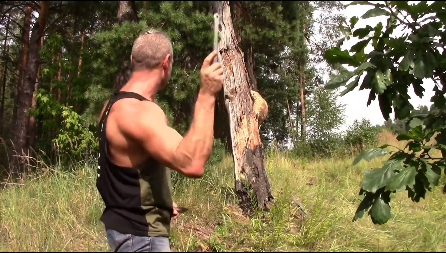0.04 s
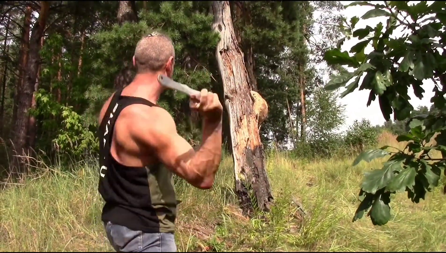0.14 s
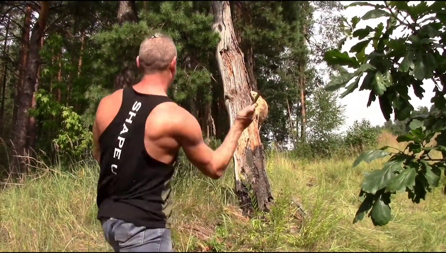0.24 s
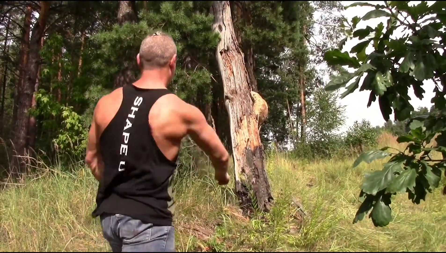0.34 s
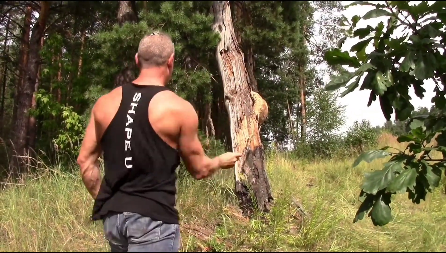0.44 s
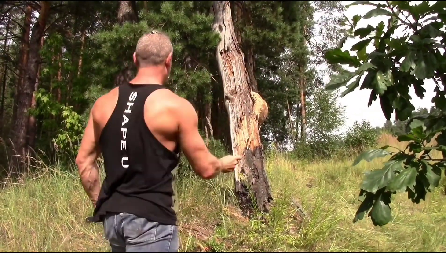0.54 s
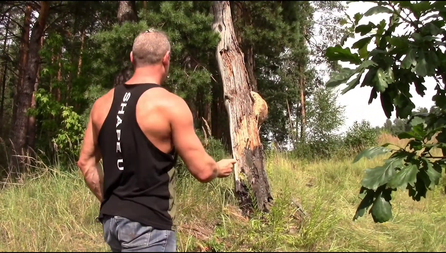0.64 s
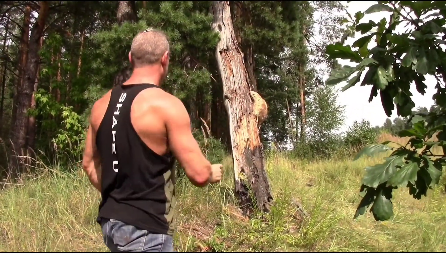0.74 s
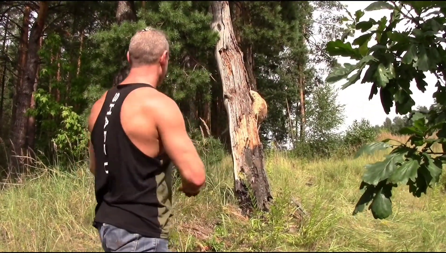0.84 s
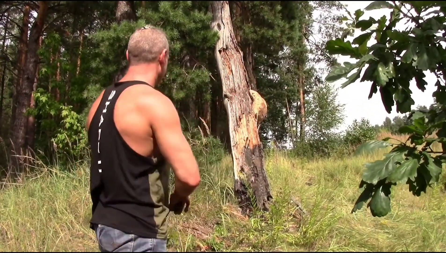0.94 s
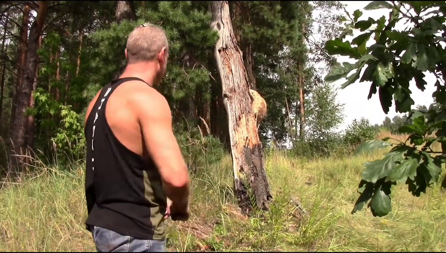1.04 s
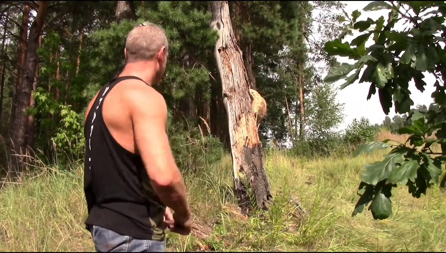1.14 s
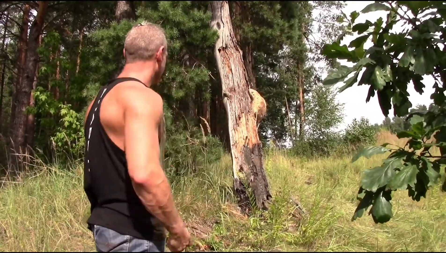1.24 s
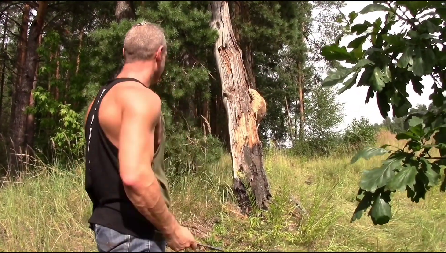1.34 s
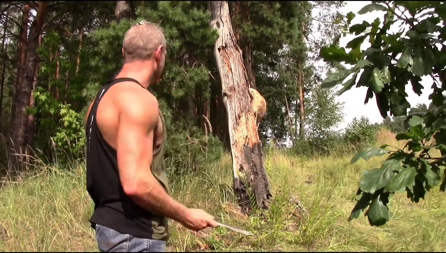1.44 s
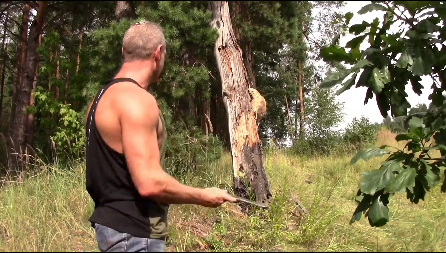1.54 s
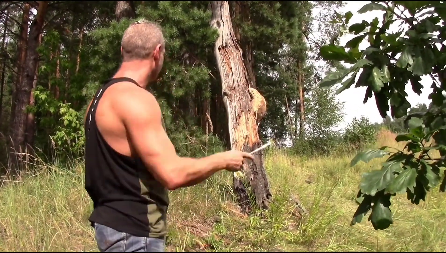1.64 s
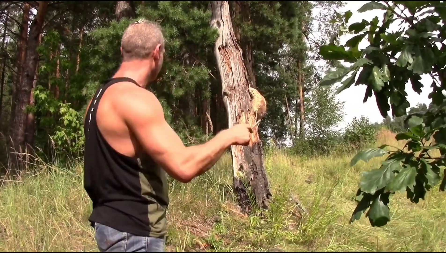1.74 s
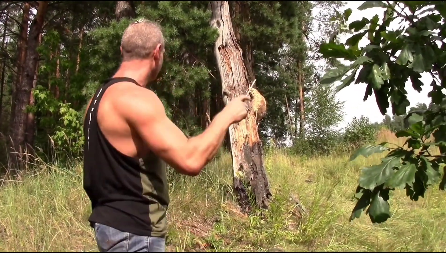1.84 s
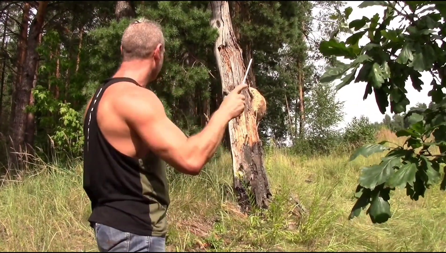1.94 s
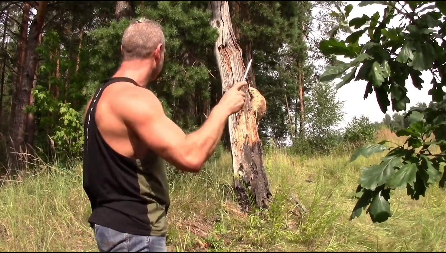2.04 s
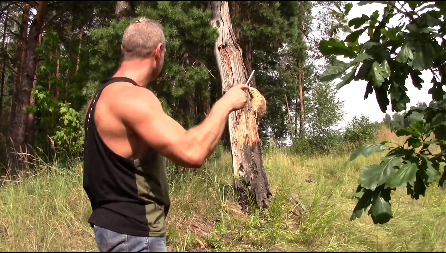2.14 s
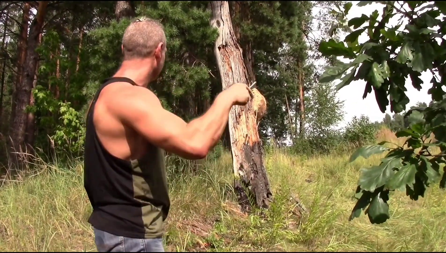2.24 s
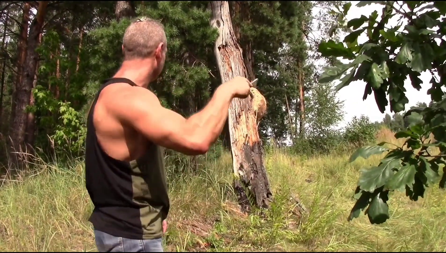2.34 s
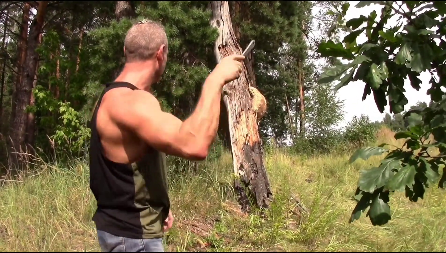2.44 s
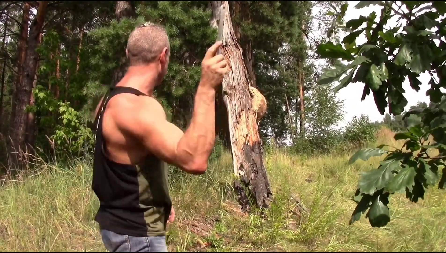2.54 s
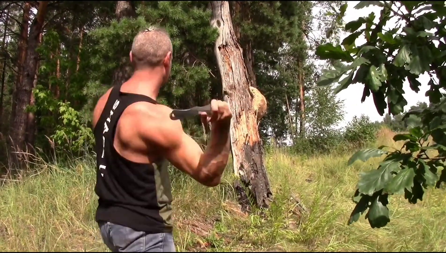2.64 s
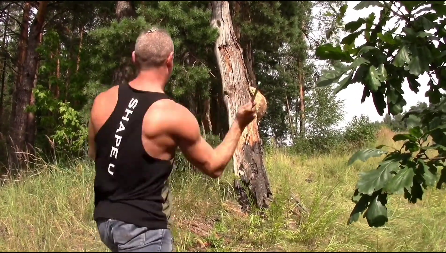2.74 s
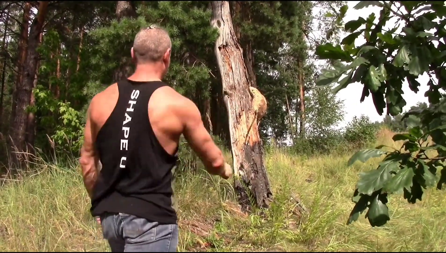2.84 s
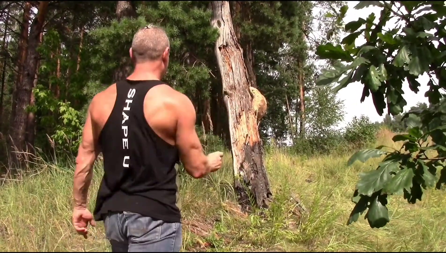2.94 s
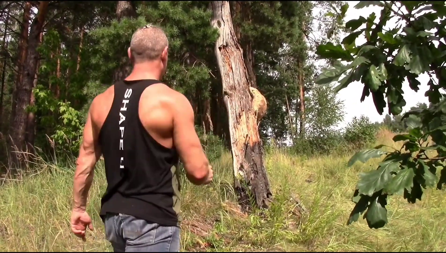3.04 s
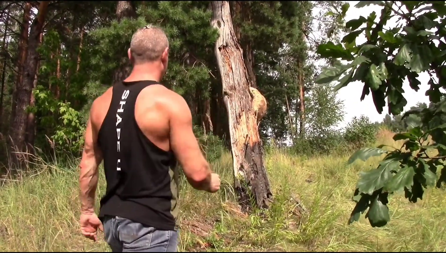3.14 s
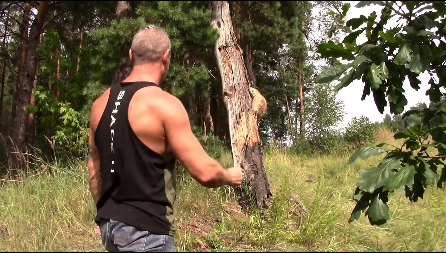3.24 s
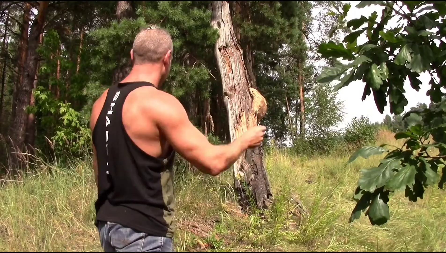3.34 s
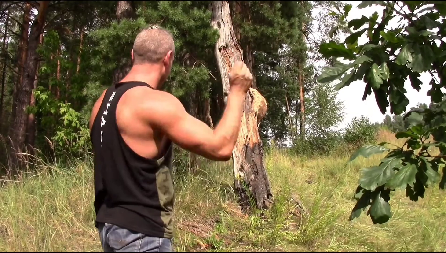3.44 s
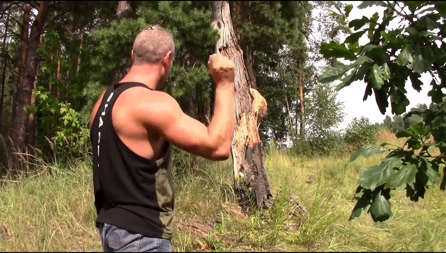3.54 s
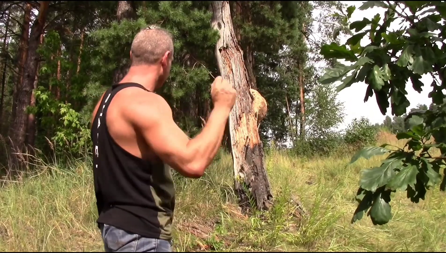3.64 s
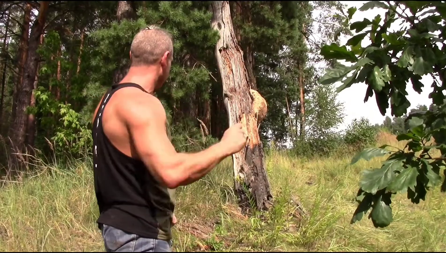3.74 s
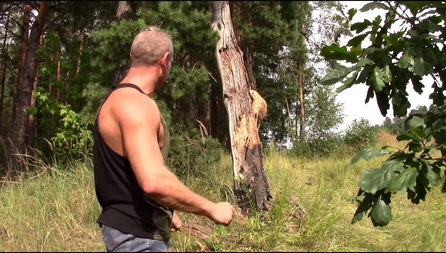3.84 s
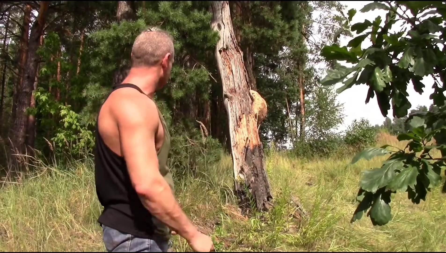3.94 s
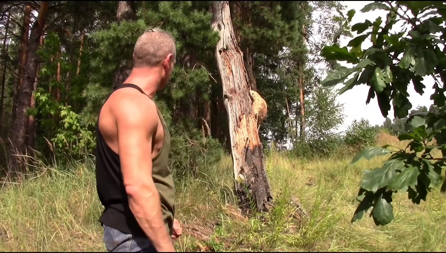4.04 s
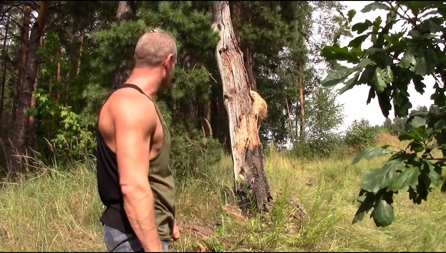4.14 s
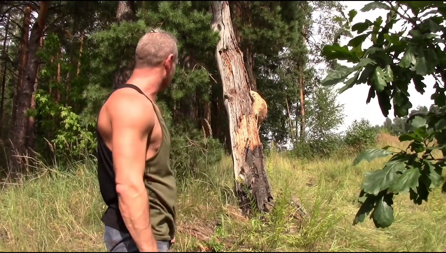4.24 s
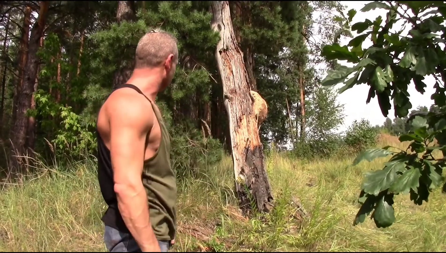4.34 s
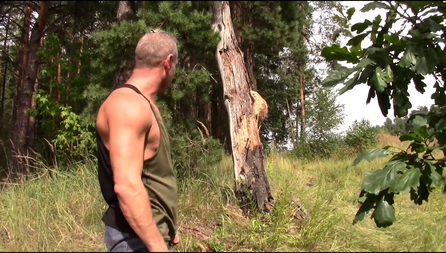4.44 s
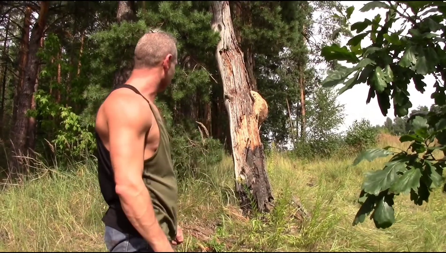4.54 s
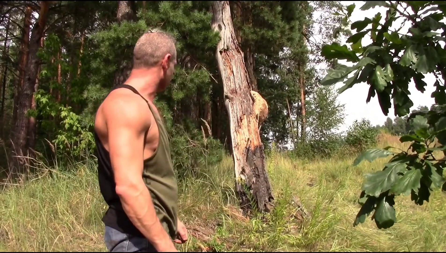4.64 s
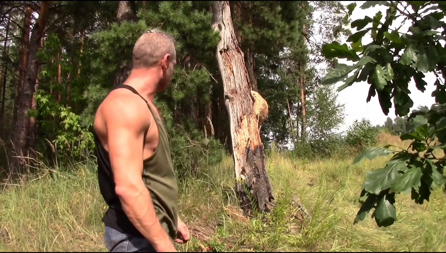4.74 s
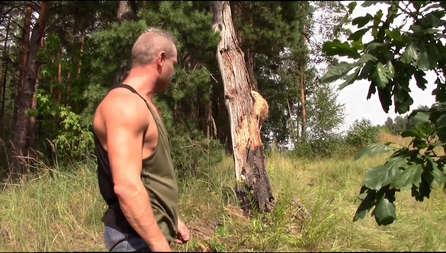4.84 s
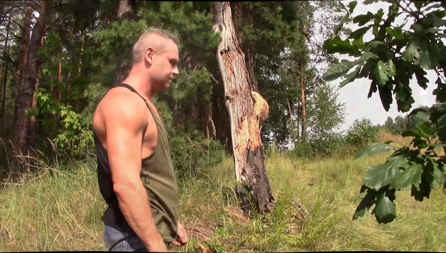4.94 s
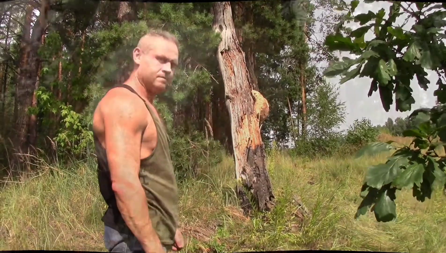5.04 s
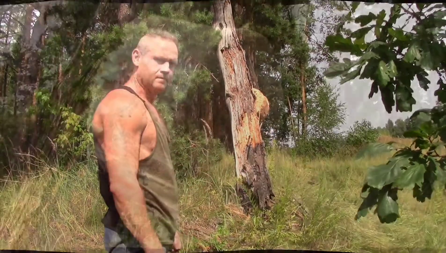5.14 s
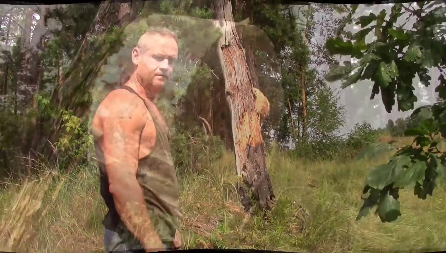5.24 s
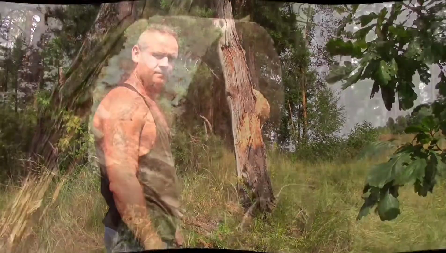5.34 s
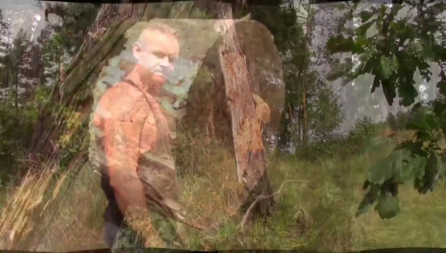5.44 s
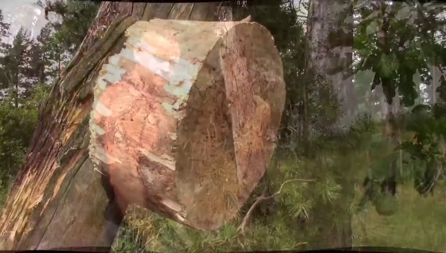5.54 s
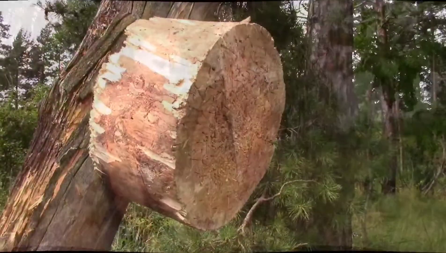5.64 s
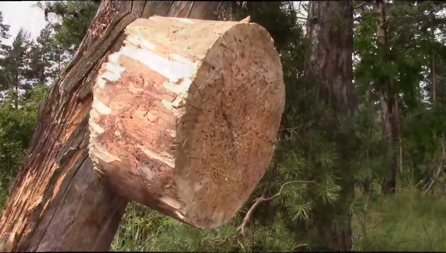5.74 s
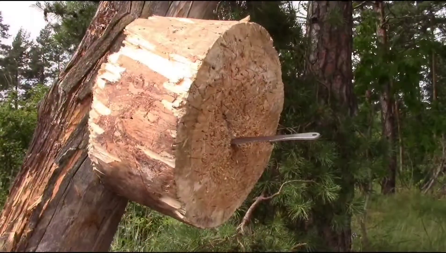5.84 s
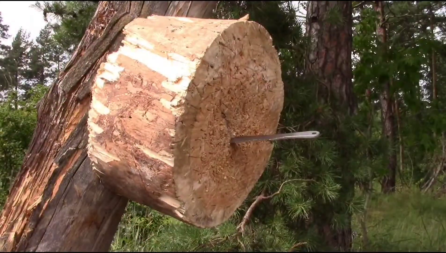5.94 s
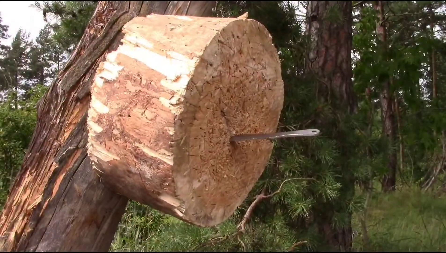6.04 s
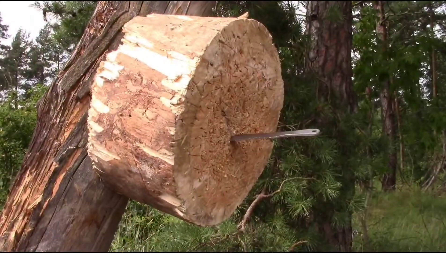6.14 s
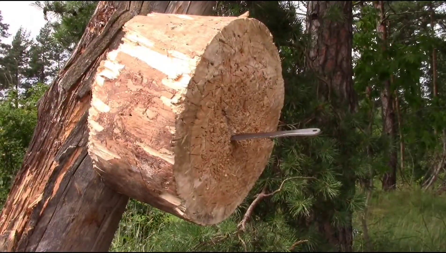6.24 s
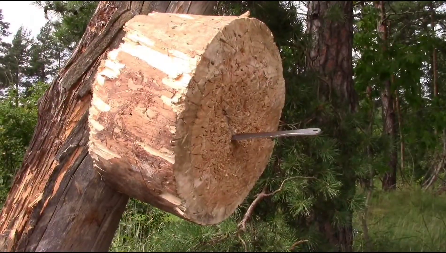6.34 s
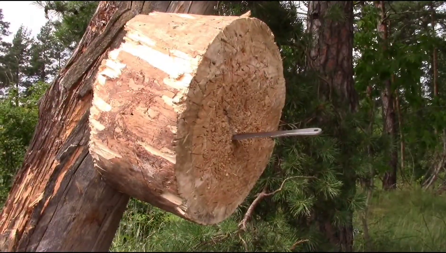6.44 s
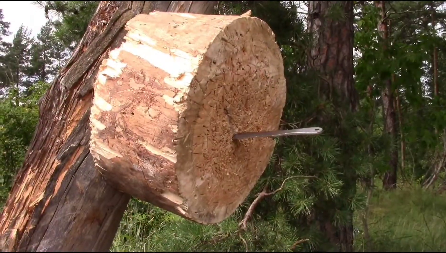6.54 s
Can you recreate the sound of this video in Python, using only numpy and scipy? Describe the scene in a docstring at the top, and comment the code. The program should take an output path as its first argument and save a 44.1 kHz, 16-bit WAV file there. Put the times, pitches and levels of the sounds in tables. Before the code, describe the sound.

Soft forest air and cloth rustle, three dry cracking knife hits in wood spaced seconds apart, ending with a short ringing clash of steel blades.

```python
"""Three knives thud into a log among pines at 0.7, 3.2 and 5.9 s: struck modes, fibre crack, bark rattle, echoes.
From the start cloth and grass rustle, twigs tick, the held blade pings and faint chirps pass; all are
shaped noise or decaying modes. The air, drifting noise with far insects, swells at 2.7 s while sinking ever
faster; at 4.94 s a closer air opens quickly, and a faint hum wavers from 5.05 to 6.6 s.
From 5.8 s the blades in the hand slide, squeak and clink: modes fed by noise slips, gliding noise, knocked modes."""
import sys
import numpy as np
from scipy import signal
from scipy.fft import rfft, irfft
from scipy.io import wavfile
from scipy.ndimage import uniform_filter1d

SR = 44100
rng = np.random.default_rng(int(sys.argv[2]) if len(sys.argv) > 2 else 0)


def waveform_to_disk(signal):
    """Save audio, clipped to [-1, 1], as 16-bit WAV at the path in sys.argv[1]."""
    frames = np.transpose(np.atleast_2d(signal))
    scaled = np.clip(frames, -1, 1) * 32767
    samples = np.round(scaled).astype(np.int16)
    wavfile.write(sys.argv[1], SR, samples)


N = 290619

# Colour of the low wash. Each row: frequency in Hz, relative density in dB.
WASH_COLOUR = [(15, -54.5), (30, -29.5), (134, -5.5), (182, -4.5), (271, -2), (413, 0), (1170, -10),
               (1580, -19), (3000, -27), (3900, -54), (6600, -120)]
# Colour of the leaf hiss before the cut. Each row: frequency in Hz, relative density in dB.
FAR_HISS_COLOUR = [(880, -33.5), (1500, 0.5), (2310, -0.5), (3150, -3), (6820, -5), (9000, -6.5),
                   (11200, -11.5), (15500, -13.5)]
# Colour of the closer leaf hiss after the cut. Each row: frequency in Hz, relative density in dB.
NEAR_HISS_COLOUR = [(880, 4), (1500, 10), (1580, 5.5), (3000, -1), (5040, -3), (9060, -5.5), (10600, -2),
                    (15500, -12)]
# Left-right likeness of the air. Each row: frequency in Hz, correlation 0-1.
AIR_LIKENESS = [(60, 0.98), (180, 0.94), (550, 0.96), (1650, 0.8), (4970, 0.57), (15000, 0.94)]
# Swells of the air. Each row: start in s, rise in s, hold in s, settling time constant in s,
# wash lift at the band centre in dB, hiss lift in dB.
AIR_SWELLS = [(2.704, 0.029, 0.28, 0.14, 9, 2.5), (5.436, 0.74, 0.017, 0.056, 1, 9.5)]
# Wavering hum. Each row: time in s, frequency in Hz, mean level in dB.
HUM_TRACK = [(5.05, 193.8, -64), (6.468, 167.1, -67), (6.59, 173, -71)]
# Tail among the trunks. Each row: frequency in Hz, t60 in s.
WOOD_T60 = [(120, 0.38), (400, 0.42), (800, 0.23), (1200, 0.2), (3000, 0.22), (6000, 0.15), (12000, 0.15)]
# Narrow gliding bands of noise: faint chirps, a steel ping at 4.238 s, blade squeaks. Each row: start in s,
# length in s, start Hz, end Hz, width in Hz, level before the fade window in dB.
GLIDE_EVENTS = [(0.55, 0.034, 2770, 2700, 130, -60), (1.466, 0.055, 2750, 2880, 150, -60.5),
                (2.978, 0.041, 2770, 2700, 170, -60), (3.035, 0.039, 2750, 2770, 180, -65),
                (4.238, .02, 5900, 5900, 500, -65), (6.081, 0.077, 1260, 3200, 410, -41.5),
                (6.11, 0.047, 3300, 4270, 530, -43.5), (6.024, 0.118, 4470, 4340, 244, -47.5),
                (6.165, 0.068, 3300, 4300, 200, -34), (6.085, 0.085, 2890, 2960, 230, -45.5)]
# Cloth and grass movements. Each row: middle in s, half length (to 1/e) in s, treble level at the middle in dB,
# body against the treble in dB.
RUSTLE_EVENTS = [(0.282, 0.17, -62.5, -4), (0.495, 0.045, -57.5, 6), (0.612, 0.042, -59.5, 10),
                 (0.924, 0.034, -59.5, 1), (1.038, 0.12, -64.5, -7), (1.248, 0.1, -54, -2),
                 (1.277, 0.034, -47, -7), (2.573, 0.046, -64, -12), (2.676, 0.038, -64, 2),
                 (2.805, 0.027, -65.5, -21), (2.987, 0.046, -63.5, 3), (3.091, .008, -63.5, 11.5),
                 (3.131, 0.0098, -64, 10), (3.386, 0.19, -69, 5.5), (5.397, 0.089, -62.5, 3),
                 (5.608, 0.06, -56, 2), (5.702, 0.021, -44.5, -0.5), (5.769, 0.065, -54.5, -2),
                 (5.851, 0.025, -51, 2), (6.346, 0.096, -63.5, 8)]
# Treble colour of a rustle. Each row: frequency in Hz, relative density in dB.
RUSTLE_COLOUR = [(1180, -50), (2000, -8), (2540, -11.5), (2970, -16), (3800, -13.5), (5130, -3.5),
                 (11300, -11), (15500, -19.5)]
# Ticks of twigs and seams, and one late steel rattle at 6.283 s. Each row: time in s, peak in dB, centre in Hz.
TICK_EVENTS = [(0.925, -35, 8000), (1.158, -31, 4100), (1.218, -51, 2500), (1.255, -27, 6000),
               (2.427, -43, 6000), (2.685, -45, 1700), (3.402, -41.5, 5000), (3.467, -28, 5104),
               (3.534, -44, 6600), (4.993, -43, 3405), (5.109, -45, 2980), (5.638, -38, 2500),
               (5.675, -35, 4500), (5.69, -26.5, 5870), (5.697, -20.5, 5700), (5.702, -23.5, 2360),
               (5.712, -26, 3460), (5.723, -21, 6540), (5.748, -33.5, 1970), (5.873, -33, 4600),
               (6.283, -25, 7500), (6.365, -33, 6950), (6.379, -33, 2100)]
# Dull taps in the hand. Each row: start in s, level in dB, frequency in Hz.
TAP_EVENTS = [(1.217, -37.5, 755), (1.241, -38, 785), (1.263, -32, 764), (1.288, -34.5, 795),
              (1.303, -37, 788), (2.686, -36.5, 967), (4.18, -56, 1600)]
# Touches of the held blade. Each row: start in s, level in dB, pitch factor, lift of the upper modes in dB.
PING_EVENTS = [(0.501, -35.5, 1, -10.5), (1.157, -47.5, 1.065, -22), (2.990, -58.5, 1.003, 2.5)]
# Blade damped by the fingers. Each row: frequency in Hz, relative level in dB, t60 in s.
HELD_BLADE_MODES = [(6200, 3, 0.068), (8420, 9, 0.052), (11000, -1, .03)]
# Long blade, free. Each row: frequency in Hz, relative level in dB, t60 in s.
LONG_BLADE_MODES = [(2000, -27.5, 0.23), (2910, -21, 0.08), (3370, -7, 0.043), (3740, -8, 0.13),
                    (6010, 10, 0.16), (6130, -22.5, 0.73), (7250, -7, 0.076), (7550, 6, 0.033),
                    (8030, 2.5, 0.094), (8640, -4.5, 0.23), (9600, -12, .035), (11710, -5, 0.073),
                    (12400, -20, 0.0265), (14700, -19, 0.064)]
# Short blade, free. Each row: frequency in Hz, relative level in dB, t60 in s.
SHORT_BLADE_MODES = [(4190, 1, 0.03), (6370, 4.5, 0.04), (7910, 4, 0.061), (8650, 9.5, 0.028),
                     (8810, 6, 0.073), (9100, -8, 0.058), (11700, -12, 0.053)]
# Blades sliding on each other. Each row: start in s, attack in s, hold in s, release in s, held level before pan
# in dB, share of the long blade 0-1 at the start, the same at the end.
SLIDE_EVENTS = [(5.821, 0.01, 0.13, 0.013, -56, 0.56, 0.45), (6, 0.06, 0.0037, 0.11, -37.5, 0.39, 0.23),
                (6.122, 0.037, 0.075, 0.013, -25.5, 0.05, 0.8)]
# Blades knocking together. Each row: start in s, peak before pan in dB, share of the long blade 0-1,
# factor on t60, brightness in dB per octave.
CLINK_EVENTS = [(6.022, -28, 0.1, 0.39, -4), (6.032, -28, 0.1, 0.55, -6), (6.039, -20, 0.2, 0.093, 0),
                (6.045, -19, 0, 0.12, 2), (6.052, -30, 0, 0.24, -3), (6.135, -24, 0.4, 0.38, 2),
                (6.1651, -18, 0.9, .3, -4), (6.176, -22, 1, 0.15, 0), (6.2034, -8, 0.73, 0.42, -2.5),
                (6.212, -12.5, 0.9, 0.38, 22), (6.227, -20, 0.6, 0.2, 5), (6.27, -10, 0.93, 0.59, -3.5)]
# Returns from nearby trunks. Each row: time of the blow in s, delay in s, gain on the blow in dB,
# centre of the returned band in Hz.
TRUNK_RETURNS = [(.698, 0.057, -15.5, 340), (.698, 0.1, -28, 950), (.698, .109, -29.5, 450),
                 (3.177, 0.08, -23, 920), (3.177, 0.11, -27, 340), (5.919, 0.031, -12.5, 1370),
                 (5.919, .056, -21.5, 513), (5.919, 0.172, -26, 414)]
# Modes of the log. Each row: frequency in Hz, t60 in s, relative level in dB at each of three spots struck.
LOG_MODES = [(185.1, 0.06, 1, -13, -51), (236, 0.098, -4.5, -13.5, -9), (323.7, 0.098, -12, -9.5, -44),
             (363.3, 0.12, -8, -37, -0.5), (413, 0.11, -12, -9, 3), (489.4, 0.054, -15, -29, 15),
             (568, 0.13, -12.5, -16, -2), (764, 0.032, -13, -12, -24), (797, 0.056, -13, 0.5, 0.5),
             (1032, 0.01, -16.5, -0.5, -22), (1126, 0.21, -24.5, -40.5, -11), (1142, 0.048, 0, -20.5, 17.5),
             (1464, 0.04, -1.5, -10, 4), (1860, 0.017, -7, -10, 8.5), (2337, 0.023, 1.5, -11, 3),
             (3087, 0.019, 1, -21, 5.5), (3640, 0.018, -12.5, -2, -25)]
# Knife blows. Each row: landing in s, log level over the first 20 ms before pan in dB, time to the dead stop in s,
# crack against the log in dB, crack centre in Hz, crack width in octaves, crack t60 in s, stop to handle whip
# in s, whip jolt in dB, factor on upper-mode t60, pitch factor, bark rattle against the log in dB,
# bark chips against the crack in dB.
BLOW_EVENTS = [(.6983, -13.5, 0.0025, -4.5, 2150, 1, 0.015, 0.0025, 4, 0.77, 1.003, -22.5, -16.5),
               (3.1762, -17, 0.0019, -4, 5270, 0.53, 0.0111, .0027, 2.5, 0.49, 0.95, -25.5, -13.5),
               (5.9187, -10, 0.00189, -3.5, 2680, 0.97, 0.0082, 0.00219, -5, 0.83, 1.02, -23, -24)]

FAR_WASH_DB, FAR_HISS_DB, NEAR_WASH_DB, NEAR_HISS_DB = -52, -62.5, -51, -59.5
CUT_S, FADE_FROM_S, FADE_IN_S = 4.94, 0.38, 0.13
FADE_OUT_DB, FADE_BEND = -17.5, 1.79  # exponent above 1: sinks ever faster
SWELL_HZ, SWELL_OCTAVES = 322, 0.92  # the wash swells most here
INSECTS_HZ, INSECTS_OCTAVES, INSECTS_DB = 7870, 0.09, -75.5
INSECTS_FADE_SHARE = 0.55  # of the air's fade in dB
WOOD_DB, WOOD_BUILD_S = -23.5, 0.01
TICK_CYCLES, TICK_OCTAVES = 5.3, .85  # a duller tick lasts longer
TAP_T60_S, TAP_RISE_S, PING_RISE_S = 0.024, 0.00069, 0.0029
SLIDE_ENDS_DB = -23  # against the held level
GRIP_DETUNE, KNOCK_RISE_S = .0015, 0.00032
CHATTER_S, CHATTER_DB = 0.0056, 3.5
SLAP_OCTAVES = 0.27
TIP_DB, TIP_HZ, TIP_T60_S = -16, 11000, 0.0046
RATTLE_HZ, RATTLE_OCTAVES, RATTLE_T60_S, RATTLE_CLUMPS_DB = 1200, 0.71, .2, 3.5
CHIPS_T60_S = 0.12
EDGE_HZ = 15700


def amp(db):
    """Decibels to linear gain."""
    return 10 ** (np.asarray(db) / 20)


def evened(x):
    """Scale to unit RMS."""
    return x / np.sqrt(np.mean(x ** 2) + 1e-20)


def read(points, hz):
    """Interpolate a table over log frequency."""
    f, value = np.transpose(points)
    return np.interp(np.log(hz + 1), np.log(f + 1), value)


def add(mix, s, sound):
    """Add a sound at a time in seconds, cut at the end of the mix."""
    part = mix[..., round(s * SR):][..., :sound.shape[-1]]
    part += sound[..., :part.shape[-1]]


def curve(rows):
    """Start time, then every column of a table sample by sample."""
    s, *columns = np.transpose(rows)
    t = np.arange(s[0], s[-1], 1 / SR)
    return [s[0]] + [np.interp(t, s, c) for c in columns]


def coloured(x, points):
    """Filter by a table of relative dB, to unit RMS."""
    gain = amp(read(points, np.fft.rfftfreq(x.shape[-1], 1 / SR)))
    return evened(irfft(rfft(x) * gain, x.shape[-1]))


def bell(hz, centre_hz, octaves):
    """Gaussian gain over log frequency."""
    return np.exp(-.5 * (np.log2((hz + 1) / centre_hz) / octaves) ** 2)


def hump(x, centre_hz, octaves):
    """Filter by a bell at least 0.2 octaves wide."""
    hz = np.fft.rfftfreq(x.shape[-1], 1 / SR)
    return irfft(rfft(x) * bell(hz, centre_hz, max(octaves, .2)), x.shape[-1])


def clumped(noise, depth_db, size):
    """Smoothed noise as an uneven gain, depth in dB RMS."""
    return amp(depth_db * evened(uniform_filter1d(noise, size=size)))


def ring(x, hz, t60):
    """One driven mode: an impulse of 1 leaves a dying sine of initial height 1."""
    radius = 1000 ** (-1 / (max(t60, .002) * SR))
    w = 2 * np.pi * hz / SR
    return signal.lfilter([0, np.sin(w)], [1, -2 * radius * np.cos(w), radius ** 2], x)


def note(hz, t60, rise_s, turn):
    """One mode that swells during contact, then dies; turn is its phase in cycles."""
    t = np.arange(SR // 3) / SR
    rise = 1 - np.exp(-t / max(rise_s, .0002))
    return rise * amp(-60 * t / max(t60, .003)) * np.sin(2 * np.pi * (hz * t + turn))


def air_db(t):
    """Levels and lifts of wash and hiss: a slow fade out, a quick fade in, swells."""
    progress = np.clip((t - FADE_FROM_S) / (CUT_S - FADE_FROM_S), 0, 1)
    fading_db = FADE_OUT_DB * progress ** FADE_BEND
    far = amp(np.array([[FAR_WASH_DB], [FAR_HISS_DB]]) + fading_db) * (t < CUT_S + FADE_IN_S)
    near = amp([[NEAR_WASH_DB], [NEAR_HISS_DB]]) * np.clip((t - CUT_S) / FADE_IN_S, 0, 1)
    swells_db = 0
    for s, rise_s, hold_s, settle_s, *lift_db in AIR_SWELLS:
        rise = np.clip((t - s) / rise_s, 0, 1)
        settle = np.exp(-np.maximum(t - s - rise_s - hold_s, 0) / settle_s)
        swells_db = swells_db + np.outer(lift_db, rise * settle)
    return 20 * np.log10(np.hypot(far, near)), swells_db


def air():
    """Random short-time spectra with drifting patches: low wash, leaf hiss, a thin band of far insects."""
    frames, hz = N // 256 + 5, np.fft.rfftfreq(1024, 1 / SR)
    a, b, c, d, patches = rng.standard_normal((frames, 513, 5)).T
    patches = uniform_filter1d(patches, size=12, axis=0)  # over frequency
    patches = evened(uniform_filter1d(patches, size=10, axis=1))  # over time
    t = np.arange(frames) * 256 / SR
    (wash_db, hiss_db), (wash_swell_db, hiss_swell_db) = air_db(t)

    def unit(gain):
        return gain[:, None] / np.linalg.norm(gain)

    swell_band = bell(hz, SWELL_HZ, SWELL_OCTAVES)[:, None]
    wash = unit(amp(read(WASH_COLOUR, hz))) * amp(wash_db + swell_band * wash_swell_db)
    far_hiss, near_hiss = [unit(amp(read(p, hz))) for p in (FAR_HISS_COLOUR, NEAR_HISS_COLOUR)]
    hiss = np.where(t < CUT_S, far_hiss, near_hiss) * amp(hiss_db + hiss_swell_db)
    fading_db = np.clip(wash_db - FAR_WASH_DB, FADE_OUT_DB, 0)
    insects_gain = amp(INSECTS_DB + INSECTS_FADE_SHARE * fading_db) * (t < CUT_S)
    insects = unit(bell(hz, INSECTS_HZ, INSECTS_OCTAVES)) * insects_gain
    gain = np.hypot(wash, np.hypot(hiss, insects))

    same = np.clip(read(AIR_LIKENESS, hz), -1, 1)[:, None]
    left = a + 1j * b
    right = same * left + np.sqrt(1 - same ** 2) * (c + 1j * d)
    spectra = np.array([left, right]) * amp(1.6 * patches)
    plain = signal.istft(left, nperseg=1024, noverlap=768)[1]
    bin_rms = np.sqrt(np.mean(plain ** 2) / len(hz))
    return signal.istft(spectra * gain, nperseg=1024, noverlap=768)[1][:, :N] / bin_rms


def wood(x):
    """Sparse echoes of random sign from the trunks; the scatter gathers, then each band dies at its own speed."""
    taps = np.zeros((2, SR // 2))
    at = np.arange(300, SR // 2 - 20, 20) + rng.integers(0, 20, (SR // 2 - 301) // 20)
    taps[:, at] = rng.choice([-1., 1.], len(at))
    taps[1] += 0.2 * np.roll(taps[0][::-1], 7)  # sides differ slightly
    hz, t, z = signal.stft(taps, SR, nperseg=256)
    decay = amp(-60 * t / read(WOOD_T60, hz)[:, None])
    tail = signal.istft(z * decay * (1 - np.exp(-t / WOOD_BUILD_S)), SR, nperseg=256)[1]
    return signal.fftconvolve(x, tail / np.linalg.norm(tail[0]), axes=1)[:, :N]


def hum():
    """A soft low sine whose level flutters."""
    s, hz, db = curve(HUM_TRACK)
    flutter = clumped(rng.standard_normal(len(hz)), 4, 4000)
    return s, np.sqrt(2) * amp(db) * flutter * np.sin(2 * np.pi * np.cumsum(hz) / SR)


def gliding_band(s, length_s, from_hz, to_hz, width_hz, db):
    """A narrow band of noise carried on a gliding tone: chirp, steel ping or blade squeak."""
    hz = np.linspace(from_hz, to_hz, round(length_s * SR))
    noise = rng.standard_normal((2, 8192))
    a, b = uniform_filter1d(noise, max(round(SR / width_hz), 1))[:, :len(hz)]
    tone = ((a + 1j * b) * np.exp(2j * np.pi * np.cumsum(hz) / SR)).real
    return s, amp(db) * evened(tone) * np.hanning(len(hz))


def rustle(middle_s, half_s, db, body_db, chance):
    """Fibres snap in clumps: sparse uneven grains over a soft swish, with a duller body."""
    noise, t = chance[:4], (np.arange(chance.shape[1]) - chance.shape[1] // 2) / SR
    grains = (chance[4] > 2.2) * amp(4.0 * np.minimum(chance[5], 2))
    snaps = uniform_filter1d(grains, size=24)
    stereo = noise[0] + 0.096 * noise[1:3]
    fibres = stereo * (2.0 + evened(snaps)) * clumped(noise[3], 3.4, 300)
    body = coloured(fibres, [(300, -30.5), (700, -1.5), (1800, -12.5), (3000, -19.0), (20000, -69.0)])
    sound = (coloured(fibres, RUSTLE_COLOUR) + amp(body_db) * body) * np.exp(-(t / half_s) ** 2)
    return middle_s + t[0] + 1, amp(db) * sound  # 1 s margin of the cloth buffer


def tick(s, db, centre_hz, chance):
    """A brief snap in a broad band: one sharp edge and a ragged tail."""
    t = np.arange(512) / SR - .002
    decay_s = np.where(t < 0, .0001, TICK_CYCLES / centre_hz)
    ragged = 0.14 * chance * np.exp(-np.abs(t) / decay_s)
    edge = abs(t) < .5 / SR
    snap = hump(ragged + edge, centre_hz, TICK_OCTAVES)
    return s - .002, amp(db) * snap / abs(snap).max()


def tap(s, db, hz):
    """A dull tap: one short mode."""
    return s, amp(db) * note(hz, TAP_T60_S, TAP_RISE_S, 0)


def ping(s, db, pitch, upper_db):
    """The held blade sounds briefly; where it is touched sets how much the upper modes speak."""
    sound = sum(amp(level_db + upper_db * (k > 0)) * note(hz * pitch, t60, PING_RISE_S, 0)
                for k, (hz, level_db, t60) in enumerate(HELD_BLADE_MODES))
    return s, amp(db) * sound


def stroke(s, attack_s, hold_s, release_s, db, share_from, share_to):
    """Attack, hold and release of a slide while the touch moves between the blades."""
    times = s + np.cumsum([0, attack_s, hold_s, release_s])
    levels_db = db + SLIDE_ENDS_DB * np.array([1, 0, 0, 1])
    shares = [share_from, (share_from + share_to) / 2, share_to, share_to]
    return np.transpose([times, levels_db, shares])


def slide(rows):
    """Steel on steel: dense small slips keep the held blades singing over a thin grit."""
    s, db, share = curve(rows)
    clumps = clumped(rng.standard_normal(len(db)), 3.4, 130)
    slips, *grit = rng.standard_normal((3, len(db))) * clumps

    def sing(modes):
        # the grip shortens each t60 to 0.18 of its free value
        return evened(sum(amp(level_db) * ring(evened(ring(slips, hz, 0.0031)), hz, 0.18 * t60)
                          for hz, level_db, t60 in modes))

    share = np.clip(share, 0, 1)
    blades = share * sing(LONG_BLADE_MODES) + (1 - share) * sing(SHORT_BLADE_MODES)
    sound = blades + 0.15 * evened(hump(np.array(grit), 9000, 0.96))
    return s, amp(db) * sound * signal.windows.tukey(len(db), .1)


def clink(s, db, share, ring_factor, tilt_db, chance, rattle):
    """Both blades ring from one rattling knock; a grip shifts each mode slightly and shortens the ring."""
    counts = [len(LONG_BLADE_MODES), len(SHORT_BLADE_MODES)]
    shares = np.repeat(np.clip([share, 1 - share], 0, 1), counts)
    sound = 0
    for part, mode, (uneven, off, turn) in zip(shares, LONG_BLADE_MODES + SHORT_BLADE_MODES, chance):
        hz, level_db, t60 = mode
        gain = part * amp(level_db + tilt_db * np.log2(hz / 6000) + 2.0 * uneven)
        sound = sound + gain * note(hz * (1 + GRIP_DETUNE * off), t60 * ring_factor, KNOCK_RISE_S, turn)
    # the edges rattle on after the first touch
    touches = rattle ** 3 * np.exp(-np.arange(len(rattle)) / (CHATTER_S * SR))
    chatter = signal.fftconvolve(sound, touches / np.linalg.norm(touches))[:len(sound)]
    sound = sound + amp(CHATTER_DB) * chatter
    return s, amp(db) * sound / abs(sound).max()


def returned(thud, centre_hz):
    """A trunk returns only a band of the blow; 256 samples of lead make room for the filter."""
    return hump(np.pad(thud, (256, 0)), centre_hz, SLAP_OCTAVES)


def struck_log(spot, push, whipped, pitch, upper_ring):
    """Log modes at one spot: the push drives the low ones, push and handle whip the upper ones."""
    log = 0
    for hz, t60, *spots_db in LOG_MODES:
        if hz > 700:
            mode = -ring(whipped, hz * pitch, t60 * upper_ring)  # starts the other way
        else:
            mode = ring(push, hz * pitch, t60)  # the push alone keeps the 185 Hz mode full
        log = log + amp(spots_db[spot]) * mode
    # too small to radiate bass
    log = signal.sosfilt(signal.butter(4, 150, "high", fs=SR, output="sos"), log)
    return log / np.std(log[:SR // 50])


def blow(spot, row):
    """The tip lands, fibres crack as the blade bites, it stops dead, the handle whips back and the log rings."""
    (s, db, stop_s, crack_db, crack_hz, crack_octaves, crack_t60, whip_s, whip_db,
     upper_ring, pitch, rattle_db, chips_db) = row
    t = np.arange(SR // 4) / SR

    def jolt(at_s):
        return np.exp(-.5 * ((t - at_s) / .00007) ** 2)

    def burst(noise, centre_hz, octaves, rise_s):
        return evened(hump(noise, centre_hz, octaves)) * np.minimum(t / rise_s, 1)

    push = 0.055 * jolt(0.0001) + jolt(stop_s)
    whipped = push + amp(whip_db) * jolt(stop_s + whip_s)
    log = struck_log(spot, push, whipped, pitch, upper_ring)

    crack_decay = amp(-60 * np.maximum(t - stop_s, 0) / crack_t60)
    chips_decay = amp(chips_db - 60 * t / CHIPS_T60_S)  # bark chips trail after the crack
    crack = burst(rng.standard_normal(len(t)), crack_hz, crack_octaves, stop_s) * (crack_decay + chips_decay)

    # the steel tip splits the surface
    tip = burst(rng.standard_normal(len(t)), TIP_HZ, 0.51, 0.0012) * amp(TIP_DB - 60 * t / TIP_T60_S)

    bark, clumps = rng.standard_normal((2, len(t)))
    rattle = burst(bark, RATTLE_HZ, RATTLE_OCTAVES, 0.0026) * clumped(clumps, RATTLE_CLUMPS_DB, 150)
    rattle = rattle * amp(rattle_db - 60 * t / RATTLE_T60_S)
    return s, amp(db) * (log + amp(crack_db) * crack + tip + rattle)


def scene():
    """Place all events, pan knives and steel, add echoes and air."""
    knives, steel, near = np.zeros((3, 2, N))
    add(near, *hum())
    for row in GLIDE_EVENTS:
        add(near, *gliding_band(*row))
    cloth = np.zeros((2, N + 2 * SR))  # 1 s margin at both ends
    for row in RUSTLE_EVENTS:
        add(cloth, *rustle(*row, rng.standard_normal((6, 2 ** 15))))
    for row in TICK_EVENTS:
        add(near, *tick(*row, rng.standard_normal(512)))
    for row in TAP_EVENTS:
        add(near, *tap(*row))
    for row in PING_EVENTS:
        add(near, *ping(*row))
    for row in SLIDE_EVENTS:
        add(steel, *slide(stroke(*row)))
    for row in CLINK_EVENTS:
        add(steel, *clink(*row, rng.standard_normal((25, 3)), rng.standard_normal(1000)))
    for spot, row in enumerate(BLOW_EVENTS):
        s, thud = blow(spot, row)
        add(knives, s, thud)
        for struck_s, delay_s, db, centre_hz in TRUNK_RETURNS:
            if abs(struck_s - s) < .1:
                add(knives, s + delay_s - 256 / SR, amp(db) * returned(thud, centre_hz))
    # the right side hears the steel a moment sooner
    slope = np.roll(steel, shift=1, axis=1) - np.roll(steel, shift=-1, axis=1)
    steel += [[.1], [-.1]] * slope
    steel *= amp([[-1.5], [1.4]])  # hand to the right
    knives *= amp([[.2], [-.2]])  # log a little to the left
    echoes = amp(WOOD_DB) * wood(knives + amp(7.5) * steel)
    return knives + steel + near + cloth[:, SR:SR + N] + echoes + air()


def record(dry):
    """A soft limit keeps the loudest peaks below full scale; a low-pass then sets the band limit."""
    rounded = .95 * np.tanh(dry / .95)
    low_pass = signal.firwin(255, EDGE_HZ, window=("kaiser", 9), fs=SR)
    return signal.oaconvolve(rounded, low_pass[None], "same")


dry = scene()
out = record(dry)
waveform_to_disk(out)
```